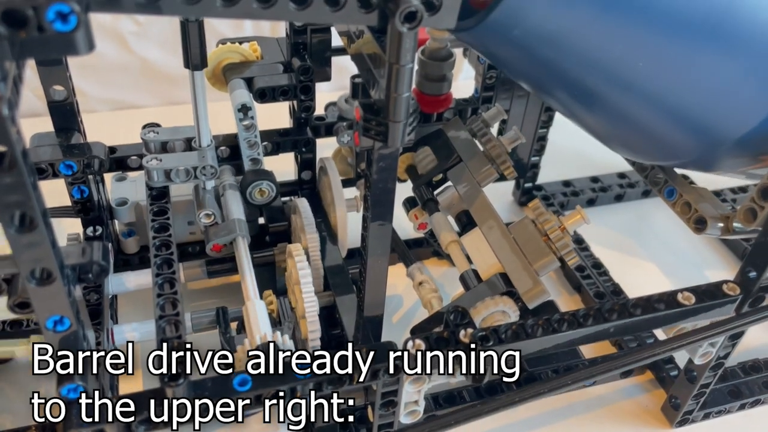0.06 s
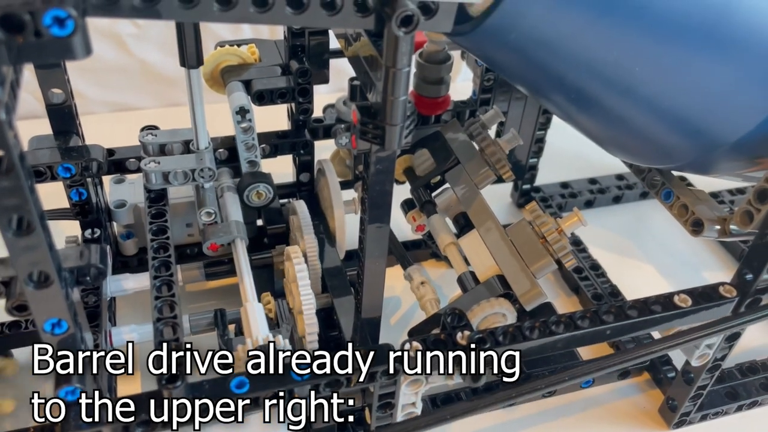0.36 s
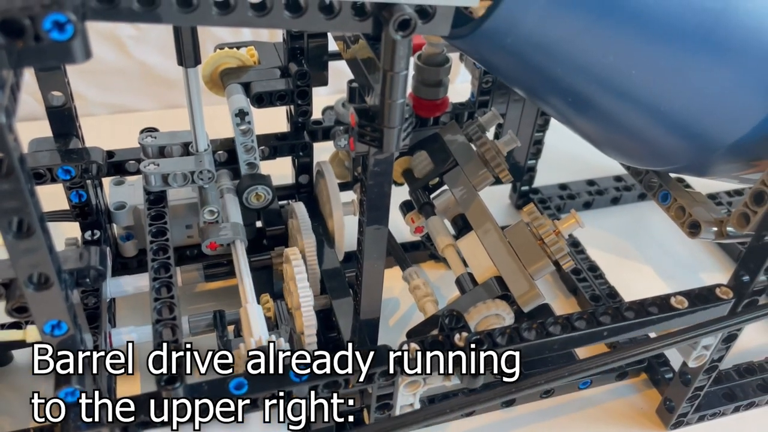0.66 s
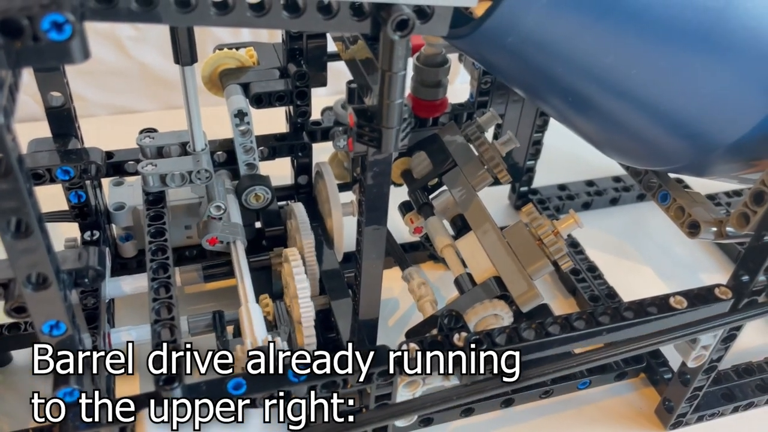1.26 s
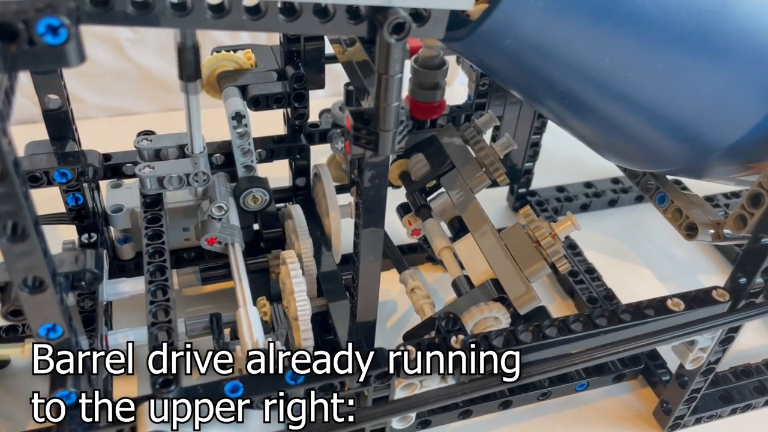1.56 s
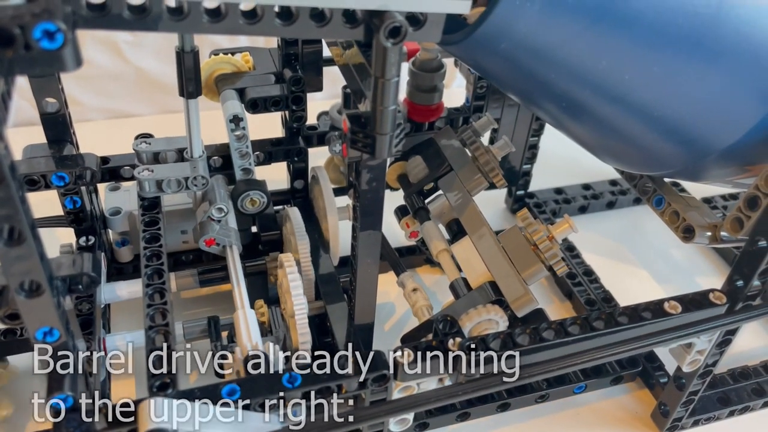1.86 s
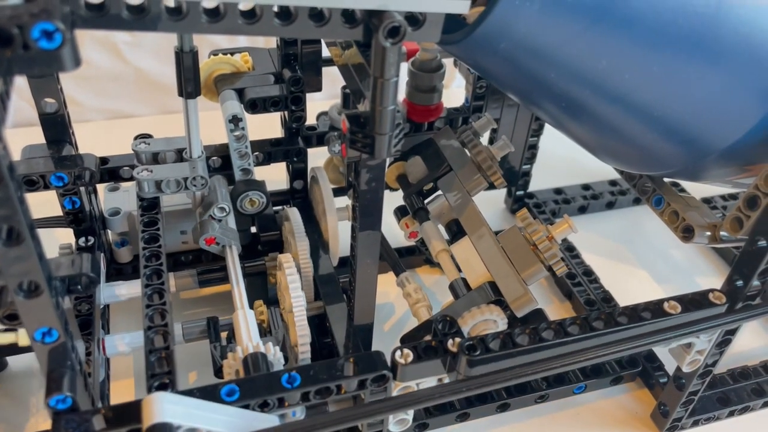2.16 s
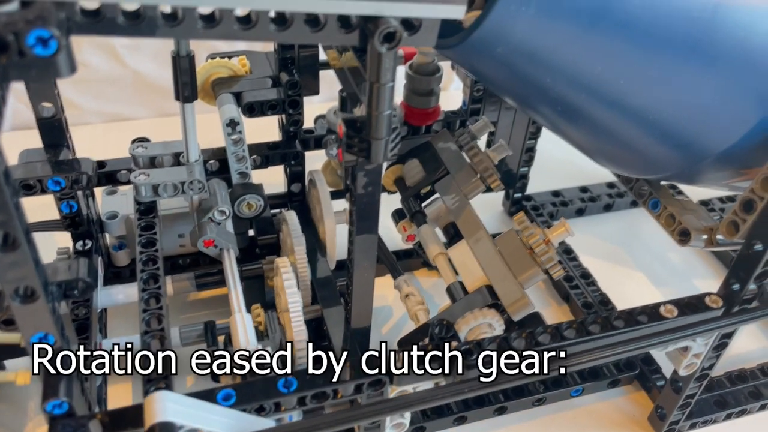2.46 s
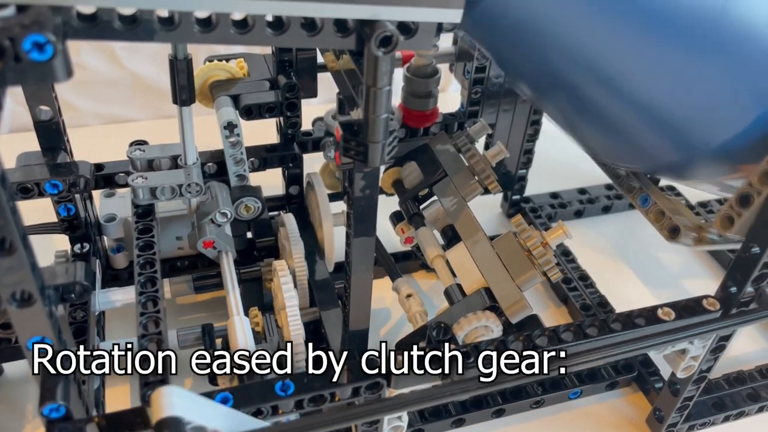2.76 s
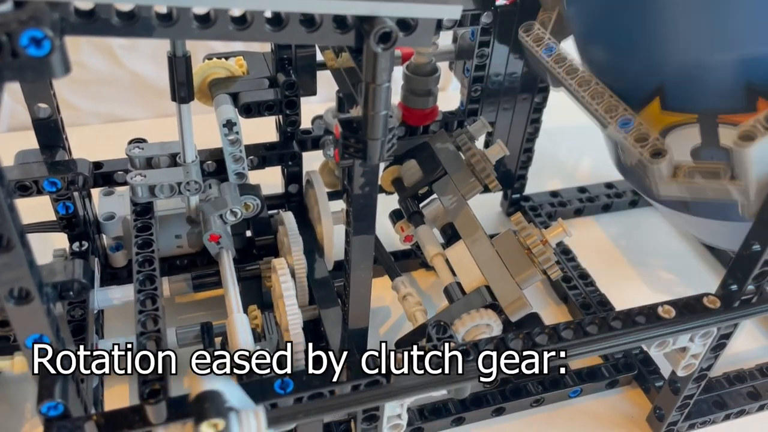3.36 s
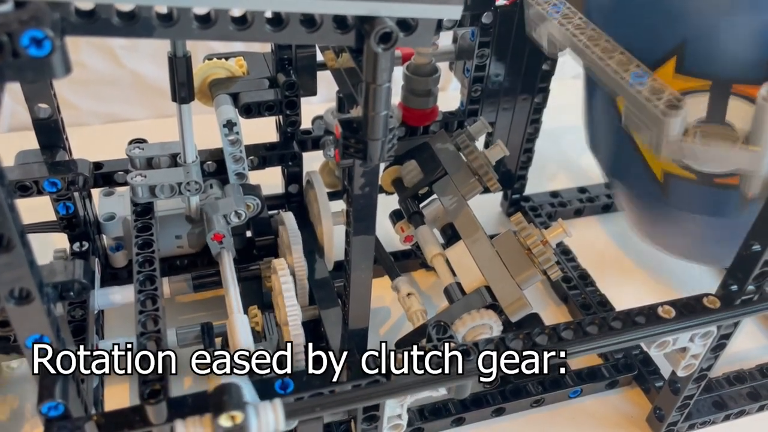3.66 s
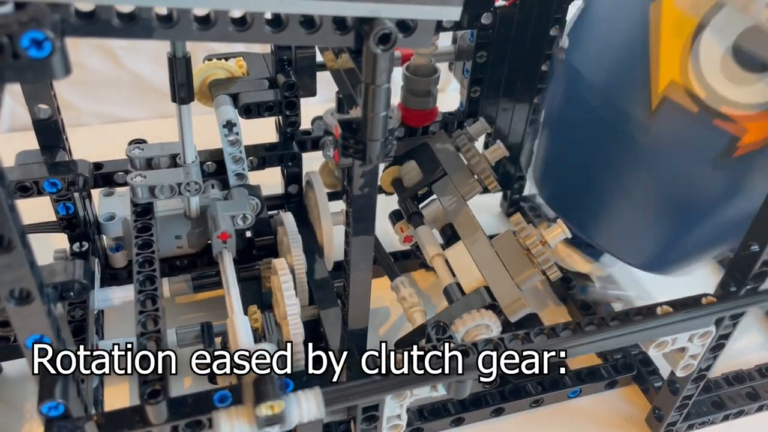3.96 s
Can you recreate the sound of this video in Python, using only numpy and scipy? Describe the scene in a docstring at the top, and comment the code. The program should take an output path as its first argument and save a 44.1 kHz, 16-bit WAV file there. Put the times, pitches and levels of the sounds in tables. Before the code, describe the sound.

Loose plastic rattles and settles, leaving a toy machine's quiet motor hum and sharp gear clicks.

```python
"""Loose plastic pieces tumble in the turning barrel of a toy machine, close by indoors.
Each landing rings the shell; the pieces scrape along the wall, settle, and slide again at the end.
A small motor hums through the gear train and sags under load. Gears snap and thump the frame
of plastic beams, and a slipping part rasps softly, grabbing once per motor turn."""
import sys
import numpy as np
from scipy import signal
from scipy.fft import rfft, irfft
from scipy.io import wavfile
from scipy.ndimage import uniform_filter1d

SR = 44100
rng = np.random.default_rng(int(sys.argv[2]) if len(sys.argv) > 2 else 0)


def put_to_file(sound):
    """Save the sound as 16-bit audio at rate SR, in the file named by the first command-line argument."""
    columns = np.atleast_2d(sound).T  # one column per channel
    safe = np.clip(columns, -1, 1)
    whole_steps = np.round(safe * 32767)
    wavfile.write(sys.argv[1], SR, whole_steps.astype(np.int16))


N = 176400
TIME_S = np.arange(N) / SR
BIN_HZ = np.arange(N + 1) * SR / (2 * N)
LEFT_RIGHT = np.array([[1], [-1]])


def undb(db):
    """Decibels to gain."""
    return 10 ** (np.asarray(db) / 20)


def curve(rows):
    """A table over time, read at each sample."""
    return np.interp(TIME_S, *np.array(rows).T)


def across(rows):
    """A table over frequency, read at each bin."""
    hz, values = np.array(rows).T
    return np.interp(np.log(BIN_HZ + 1), np.log(hz), values)


def shape(x, response):
    """Filter by a frequency response."""
    return irfft(rfft(x, 2 * N) * response)[..., :N]


def colour(x, rows):
    """Minimum-phase filter of unit power with the given (Hz, dB) outline."""
    gain = undb(across(rows))
    cepstrum = irfft(np.log(gain / np.sqrt(np.mean(gain ** 2))))
    cepstrum[1:N] *= 2
    cepstrum[N + 1:] = 0
    return shape(x, np.exp(rfft(cepstrum)))


# Stereo width. Each row: frequency in Hz, amplitude share opposed between left and right.
SIDE_SHARE = [(60, 0.11), (300, 0.16), (1400, 0.32), (3000, 0.49), (5000, 0.29), (9000, 0.14),
              (16000, 0.15)]


def noise():
    """Stereo white noise, mostly common to both sides."""
    mid, side = rng.standard_normal((2, N))
    share = np.clip(across(SIDE_SHARE), 0, 1)
    return shape(mid, np.sqrt(1 - share ** 2)) + shape(side, share) * LEFT_RIGHT


def wander(rate_hz):
    """Smooth random drift of unit spread."""
    hold = max(int(SR / rate_hz), 2)
    steps = np.repeat(rng.standard_normal(N // hold + 1), hold)
    drift = uniform_filter1d(uniform_filter1d(steps, hold), hold)[:N]
    return drift / drift.std()


def bursts(starts_s, levels_db, t60_s):
    """A sharp, fast-dying noise burst for each contact."""
    power = np.zeros(N)
    at = (np.asarray(starts_s) * SR).astype(int)
    inside = (at >= 0) & (at < N)
    np.add.at(power, at[inside], undb(levels_db)[inside] ** 2)
    decay = np.exp(-2 * np.log(1000) / (t60_s * SR))
    return noise() * np.sqrt(signal.lfilter([1], [1, -decay], power + 1e-18))


def ring(x, modes):
    """Resonances driven by x, each with its gain at the peak."""
    out = 0
    for hz, t60_s, db in modes:
        radius = np.exp(-np.log(1000) / (t60_s * SR))
        poles = [1, -2 * radius * np.cos(2 * np.pi * hz / SR), radius * radius]
        out = out + undb(db) * signal.lfilter([1 - radius, 0, radius - 1], poles, x)
    return out


def struck(start_s, hz, t60_s):
    """One mode set ringing: a decaying sine."""
    out, at = np.zeros(N), int(start_s * SR)
    t = np.arange(min(SR // 2, N - at)) / SR
    out[at:at + len(t)] = np.sin(2 * np.pi * hz * t) * np.exp(-np.log(1000) * t / t60_s)
    return out


# Pieces landing. Each row: start in seconds, relative level in dB, treble offset in dB.
LANDINGS = [(0.031, -4.5, -3), (0.041, -5, -1), (.050, -17, 1), (.059, -8.5, 4.5), (.062, -1, -0.5),
            (0.067, -10, -3), (.074, -16.5, 6), (.089, -9, 2), (0.092, -2, -3), (0.1, -9, -9),
            (.114, -14.5, 1), (.126, -3.5, 4.5), (.132, -7, -3), (0.139, -5, 2), (0.147, -4.5, -1),
            (0.155, -9.5, 2), (0.17, -12.5, -1), (0.183, -9, 0), (.191, -6.5, -6), (0.218, -13, 8),
            (.226, -13.5, 6.5), (0.24, -3.5, 1.5), (.252, -10, -4), (0.266, -7, -4), (0.279, -9, 2),
            (.284, -4.5, 0), (0.297, -20, -6), (0.305, -4, -2.5), (0.317, -9.5, 2), (.329, -12, -5),
            (0.341, -18, -4), (.358, -9, 3), (0.37, -9, 3.5), (.379, -10, 1), (0.395, -4.5, 0),
            (0.396, -3.5, -3), (0.411, -9, -3), (0.421, -11, -2), (0.435, -7.5, -11), (.443, -10.5, 6.5),
            (0.455, -15, -14), (.463, -8.5, -1.5), (.482, -9.5, 2), (.510, -7.5, 1.5), (.518, -6, 0.5),
            (.533, -10, 2.5), (0.546, -6.5, -5), (.580, -10, 0), (0.598, -25, -5), (0.608, -11.5, 3),
            (.630, -8.5, 2.5), (.668, -14, -1), (.722, -12, -1), (.776, -17, -1.5), (0.813, -21, -2.5),
            (0.842, -20, -12), (.908, -26.5, -16), (2.132, -21, -12), (2.291, -32, -10), (2.827, -25.5, -6),
            (3.084, -16.5, -15), (3.102, -27, -10), (3.118, -30, -18), (3.183, -26, -12), (3.23, -25, -14),
            (3.597, -23, -7), (3.935, -15.5, -4.5), (3.960, -16, 4.5), (3.975, -13, -8), (3.990, -20, -4)]
# Small contacts between landings. Each row: time in seconds, relative level in dB.
JOSTLE_DB = [(0, -17), (.025, -37), (.05, -26), (.3, -25), (.54, -27.5), (.69, -29.5), (.8, -46), (1., -53),
             (3.45, -48.5), (3.63, -36.5), (3.72, -49), (3.9, -37), (4., -29)]
# Broad colour of a contact. Each row: frequency in Hz, relative gain in dB.
SHELL_COLOUR = [(25, -36), (100, -26), (250, -22), (700, -23.5), (1050, -3), (1600, .5), (3000, 2),
                (4000, -6.5), (5200, -3), (6500, -3), (8200, -2), (11300, -10.5), (12800, -20),
                (15500, -12.5)]
# Shell resonances. Each row: frequency in Hz, T60 in seconds, relative gain in dB.
SHELL_MODES = [(913, 0.14, 2.5), (1070, 0.087, 7), (1480, 0.17, -10), (1513, 0.068, 12), (1623, 0.11, -2.5),
               (1732, 0.078, 6), (2003, 0.083, 3), (2197, 0.13, 4), (2372, .1, 3), (2672, .04, 0.5),
               (2956, 0.045, -0.5), (3410, 0.093, 2.5), (3917, .06, -3), (4700, 0.05, -5.5)]
# Air resonances in the barrel. Each row: frequency in Hz, T60 in seconds, gain in dB.
HOLLOW_MODES = [(314.5, 0.073, -11.5), (460, .11, -3)]
# Rolling load driving that air. Each row: time in seconds, level in dB.
ROLLING_DB = [(0, 2), (.05, -8), (.09, 1), (.16, 4), (.21, -4), (.26, 0), (.35, -6), (.405, 0.5), (.5, -14),
              (.8, -16.5), (1., -28), (3.5, -44), (3.8, -15), (4, -17)]


def tumbling(rebound_s=0.0056, rebound_db=-8, jostles_per_s=420, jostle_spread_db=3.5, split_hz=5000):
    """Pieces land, rebound twice and jostle, ringing the shell; the rolling load sounds the hollow."""
    start_s, db, treble_db = np.array(LANDINGS).T
    delays_s = np.cumsum(rebound_s * (.5 + rng.random((len(start_s), 2))), axis=1)
    bounce_s = np.r_[start_s, start_s + delays_s[:, 0], start_s + delays_s[:, 1]]
    bounce_db = np.r_[db, db + rebound_db, db + 2 * rebound_db] - 3

    gap_draw, level_draw = rng.random((4000, 2)).T
    jostle_s = np.cumsum(-np.log(1 - gap_draw)) / jostles_per_s
    scatter_db = jostle_spread_db * (-np.log(1 - level_draw * .95) - 1)
    jostle_db = np.interp(jostle_s, *np.array(JOSTLE_DB).T) + scatter_db

    contact_s = np.r_[bounce_s, jostle_s]
    low_db = np.r_[bounce_db, jostle_db]
    high_db = np.r_[bounce_db + np.tile(treble_db, 3), jostle_db - 6]
    low_share = 1 / (1 + (BIN_HZ / split_hz) ** 6)
    hits = shape(bursts(contact_s, low_db, t60_s=0.041), np.sqrt(low_share))
    hits += shape(bursts(contact_s, high_db, t60_s=0.029), np.sqrt(1 - low_share))

    # Where a piece lands decides which modes ring.
    ringing = sum(ring(hits * undb(3 * wander(60)), [mode]) for mode in SHELL_MODES)
    hollow = ring(noise() * undb(curve(ROLLING_DB)), HOLLOW_MODES)
    return undb(-5.5) * colour(hits, SHELL_COLOUR) + undb(1.5) * ringing + hollow


# Scrape on the barrel wall. Each row: time in seconds, level in dB.
SCRAPE_DB = [(0, -43), (.5, -38), (.7, -44), (.9, -58.5), (3.07, -56), (3.09, -43), (3.125, -46),
             (3.15, -48.5), (3.5, -56), (3.63, -49), (3.85, -44.5), (3.93, -38.5), (4, -30.5)]
# Its colour. Each row: frequency in Hz, relative gain in dB.
SCRAPE_COLOUR = [(500, -23.5), (900, 0.5), (1300, -7), (1550, 9.5), (2100, 4.5), (2700, 1), (4000, -12.5),
                 (8000, -47)]


def sliding(roughness_db=5.5):
    """Pieces scrape unevenly along the wall as the barrel lifts them."""
    return undb(curve(SCRAPE_DB) + roughness_db * wander(120)) * colour(noise(), SCRAPE_COLOUR)


# Motor speed. Each row: time in seconds, turns per second.
SHAFT_HZ = [(0, 158), (.9, 159.8), (1.5, 159.8), (1.8, 157.3), (2.15, 154.8), (2.4, 154), (2.63, 153.9),
            (2.95, 156.5), (3.2, 158.2), (3.5, 158.5), (3.75, 158.2), (4, 159)]


def shaft_angle(jitter=0.002953, hunting=0.000797):
    """Angle in radians of the motor shaft, which sags under load and hunts a little."""
    speed_hz = curve(SHAFT_HZ) * (1 + jitter * wander(30) + hunting * wander(8))
    return 2 * np.pi * np.cumsum(speed_hz) / SR


# Motor tones. Each row: multiple of shaft speed, relative level in dB, left minus right in dB.
MOTOR_TONES = [(1.01, -52, 15), (1.999, -49.5, 14), (3.04, -49.5, 15.5), (4.046, -55, 22), (5, -59, 21),
               (5.98, -43, 13.5), (6.985, -49.5, 12), (8.2, -83, -5), (8.99, -43.5, 9), (12.1, -51.5, 9.5),
               (13, -57, 16), (15.5, -64, 0), (17.3, -52.5, -3), (21.7, -57.5, -13), (26.53, -53, 1.5),
               (34.7, -58, -6)]
# Whole drive, then its tones alone. Each row: time in seconds, relative gain in dB.
LOAD_DB = [(0, -4.5), (.8, -4), (1.1, -4), (1.5, 1), (1.9, 0), (2.2, 0), (2.7, 0), (3.05, -0.5), (3.4, 0),
           (3.7, 1.5), (4, 0)]
WHINE_DB = [(0, 0), (1.25, -1), (1.9, 1), (2.3, 0.5), (2.65, -1), (3.05, 0), (4, -0.5)]
# Gear whirr, rolling hiss, frame rumble. Each row: frequency in Hz, relative gain in dB.
WHIRR_COLOUR = [(200, -11), (350, 1), (520, -0.5), (680, 0), (850, -2), (1100, -2.5), (1400, -3.5),
                (1650, -12), (2200, -10), (3400, -11), (4700, -16.5), (5400, -12), (6500, -23),
                (12000, -24)]
HISS_COLOUR = [(2000, -10), (5000, -5.5), (6500, 0.5), (8000, 8.5), (10000, 3.5), (11800, -1), (13300, -11),
               (15000, 6), (16000, -5)]
RUMBLE_COLOUR = [(25, -58), (50, -31), (80, -5), (105, -5.5), (130, 3), (165, -4), (230, -15), (320, -4.5),
                 (420, -11), (700, -39), (2000, -56)]


def drive(shaft_rad, tone_waver_db=2, tooth_depth=0.27):
    """Motor tones follow the shaft, gear teeth pulse the whirr and hiss, and the frame rumbles."""
    tones = 0
    for multiple, db, pan_db in MOTOR_TONES:
        gain = undb(db + tone_waver_db * wander(23.98) + LEFT_RIGHT * pan_db / 2)
        tones = tones + gain * np.sin(multiple * shaft_rad + 2 * np.pi * rng.random())
    whine = undb(curve(WHINE_DB) - 2) * tones
    teeth = 1 + tooth_depth * np.cos(3 * shaft_rad)
    whirr = undb(-42.5 + 1.3 * wander(30)) * colour(noise() * teeth, WHIRR_COLOUR)
    hiss = undb(-44.5 + .9 * wander(30)) * colour(noise() * teeth, HISS_COLOUR)
    rumble = undb(-38.5 + 2 * wander(14)) * colour(noise(), RUMBLE_COLOUR)
    return undb(curve(LOAD_DB)) * (whine + whirr + hiss + rumble)


# Sharp plastic cracks. Each row: start in seconds, relative level in dB, treble offset in dB,
# then the struck part's pitch in Hz, level in dB and T60 in seconds.
CRACKS = [(1.545, -17, -6, 4330, -42, .02), (1.567, -1.5, -0.5, 11600, -14, .007),
          (1.7202, -4, 1, 4850, -14.5, .017), (1.768, -10, -22, 4940, -40, .02),
          (1.829, -8, -10, 4100, -30.5, .03), (2.031, -17, 6, 5950, -41, .02),
          (2.5348, -3, -5, 5840, -17.5, .024), (2.5942, -9, -21, 2430, -26, 0.022),
          (2.637, -7, -22, 3270, -25.5, 0.014), (2.8087, -10.5, 3, 3600, -27, .022),
          (3.083, -12, -28, 1056, -29, 0.086), (3.7727, -15, 1, 4700, -38, 0.018),
          (3.816, -11, -18, 5000, -29, 0.033), (3.83, -15, -12, 5040, -27, 0.041),
          (3.88, -17, -21, 5000, -36, .03)]
# Body and sharp edge of a crack. Each row: frequency in Hz, relative gain in dB.
BODY_COLOUR = [(40, -40), (200, -18), (700, 8), (1200, 3.5), (2000, 7.5), (4500, 0.5), (6500, 2.5),
               (9000, -7), (16000, -7.5)]
EDGE_COLOUR = [(2000, -8), (6000, -2.5), (8600, 4), (11500, -9), (13500, -10), (16000, -11)]
# Gear resonances. Each row: frequency in Hz, T60 in seconds, gain in dB.
GEAR_MODES = [(1827, 0.12, 10), (2590, .04, -9), (3650, 0.078, 8), (4150, 0.021, 13), (5030, 0.022, 3),
              (6170, 0.11, -7)]


def plastic_cracks():
    """Gear snaps, and one dull knock of a piece landing; each rings the gears and the struck part."""
    start_s, db, treble_db = np.array(CRACKS).T[:3]
    crack = bursts(start_s, db - 19, t60_s=0.047)
    edge = bursts(start_s, db + treble_db - 16.5, t60_s=0.032)
    notes = sum(undb(note_db) * struck(at_s, hz, t60_s) for at_s, _, _, hz, note_db, t60_s in CRACKS)
    return colour(crack, BODY_COLOUR) + ring(crack, GEAR_MODES) + colour(edge, EDGE_COLOUR) + notes


# Jolts to the frame. Each row: start in seconds, relative level in dB, base T60 in seconds,
# softness of the push in ms.
JOLTS = [(1.574, -17, 0.094, 0.59), (1.594, -9.5, 0.15, 3.2), (1.725, -19.5, 0.081, 0.13),
         (2.534, -21, 0.095, 0.19), (2.599, -21.5, 0.097, 0.93), (2.636, -30.5, 0.14, .9)]
# Frame resonances. Each row: frequency in Hz, share of the base T60, relative gain in dB.
FRAME_MODES = [(62, .6, -19), (84, 0.63, -16), (117.5, 0.92, 0.5), (211, 0.6, 0.5), (324.6, 0.62, 0.5),
               (378, 0.45, -2.5), (670, 0.31, 0)]


def frame_thumps(attack_s=0.0045):
    """The frame takes each jolt; a softer push favours its lowest modes."""
    out = 0
    for start_s, db, t60_s, soft_ms in JOLTS:
        modes = 0
        for hz, share, mode_db in FRAME_MODES:
            rolloff = np.hypot(1, 2 * np.pi * hz * soft_ms * 1e-3)
            modes = modes + undb(mode_db) / rolloff * struck(start_s, hz, t60_s * share)
        attack = 1 - np.exp(-np.maximum(TIME_S - start_s, 0) / attack_s)
        out = out + undb(db) * modes * attack
    return undb(3.5) * out


# Rasp of the slipping part. Each row: time in seconds, level in dB.
SLIP_DB = [(0, -70), (1.6, -68), (1.8, -45), (2.15, -45.5), (2.3, -42), (2.75, -41.5), (3.02, -56),
           (3.08, -53), (4, -67)]
# Its colour. Each row: frequency in Hz, relative gain in dB.
SLIP_COLOUR = [(5000, -6.5), (8500, -28), (9400, 7.5), (11000, -1), (12500, -3), (13500, -7), (15500, -4)]
# Spells of harder rubbing. Each row: start in seconds, length in seconds, centre in Hz, level in dB.
HARD_RUBS = [(2.23, .14, 9300, -40), (2.423, .085, 9450, -38.5), (2.718, 0.047, 9650, -39.5),
             (2.868, 0.078, 10600, -41.5), (2.972, 0.055, 10600, -39)]


def slipping(shaft_rad, decay_turns=0.49, scatter_db=3, pulsed_share=0.8, width_hz=1000):
    """Plastic grabs plastic once per motor turn: a dry rasp that swells into spells of high ticks."""
    turn, phase = np.divmod(shaft_rad / (2 * np.pi), 1)
    strength = undb(scatter_db * rng.standard_normal(N)[turn.astype(int)])
    grabs = np.exp(-phase / decay_turns) * strength
    power = grabs ** 2 / np.mean(grabs ** 2)
    pulsing = np.sqrt(1 - pulsed_share + pulsed_share * power)
    rasp = undb(curve(SLIP_DB)) * colour(noise() * pulsing, SLIP_COLOUR)
    ticks = noise() * grabs
    for start_s, length_s, hz, db in HARD_RUBS:
        detune = (BIN_HZ - hz) / width_hz
        band = shape(ticks, 1 / (1 + 2j * detune) / np.hypot(1, detune / 2))
        progress = np.clip((TIME_S - start_s) / length_s, 0, 1)
        swell = np.abs(np.sin(np.pi * progress)) ** .5
        rasp = rasp + undb(db) * band / band.std() * swell
    return rasp


def room(x, t60_s=0.16, tail_db=-16):
    """Adds the short, dull tail of a furnished room."""
    tail = colour(rng.standard_normal((2, N)), [(100, 7.5), (3000, 1.5), (8000, -2.5), (16000, -26)])
    tail *= np.exp(-np.log(1000) * TIME_S / t60_s)
    tail /= np.sqrt(np.sum(tail[0] ** 2))
    return x + undb(tail_db) * shape(x, rfft(tail, 2 * N))


def scene():
    """The whole machine; tumbling and cracks excite the room."""
    shaft_rad = shaft_angle()
    clatter = room(tumbling() + plastic_cracks())
    return clatter + sliding() + frame_thumps() + drive(shaft_rad) + slipping(shaft_rad)


# Stereo balance. Each row: frequency in Hz, left minus right in dB.
BALANCE_DB = [(60, 1.7), (600, 0.5), (1500, -0.5), (2400, 0.5), (3000, 7.5), (3600, 1), (5000, 2),
              (6300, 5.5), (7100, -.5), (16000, 0.5)]
# Stereo phase, with the sides nearly opposed around 7 kHz.
# Each row: frequency in Hz, lead of the left side in radians.
LEAD_RAD = [(100, 0), (2200, .2), (2950, 1.6), (3600, 0), (5400, 0), (6000, -1), (6650, -3), (7500, -3.35),
            (9000, -4.5), (10500, -6), (11600, -6.5), (14000, -9.1), (16000, -10)]


def record(dry, low_cut_hz=31, top_hz=15900):
    """Left and right differ in level and phase; the deep bass and the top are cut."""
    half = LEFT_RIGHT / 2
    sides = undb(half * across(BALANCE_DB)) * np.exp(1j * half * across(LEAD_RAD))
    low_cut = signal.butter(2, low_cut_hz, "high", fs=SR, output="sos")
    top_cut = signal.ellip(10, .2, 70, top_hz, fs=SR, output="sos")
    return signal.sosfilt(top_cut, signal.sosfilt(low_cut, shape(dry, sides)))


dry = scene()
out = record(dry)
put_to_file(out)
```